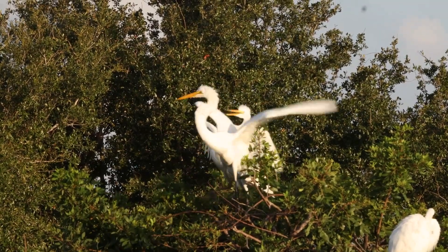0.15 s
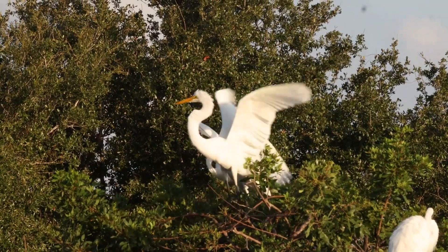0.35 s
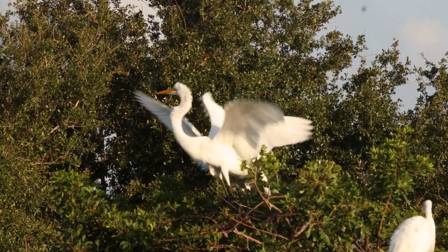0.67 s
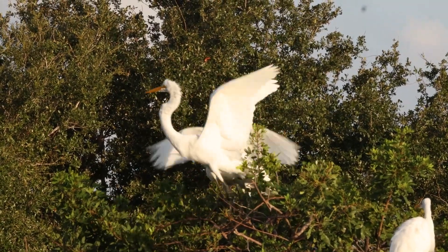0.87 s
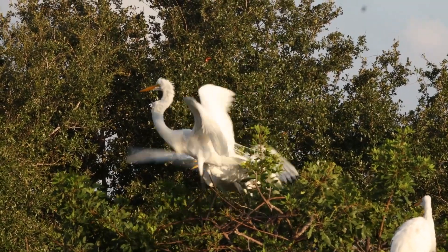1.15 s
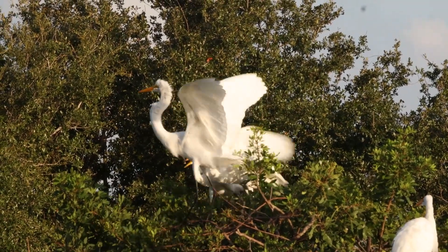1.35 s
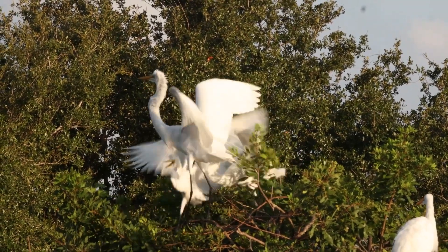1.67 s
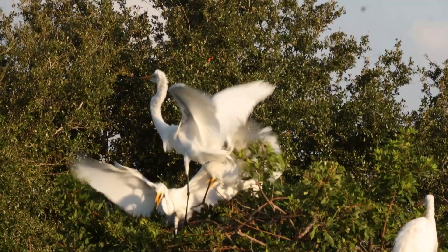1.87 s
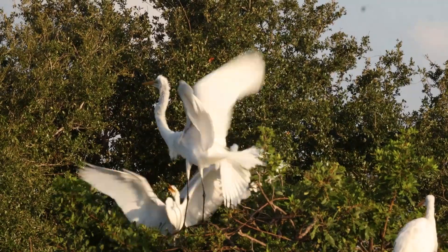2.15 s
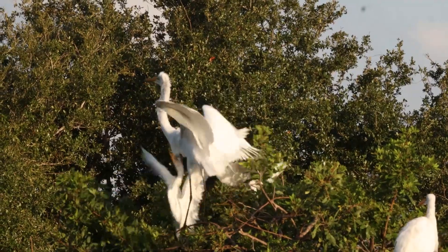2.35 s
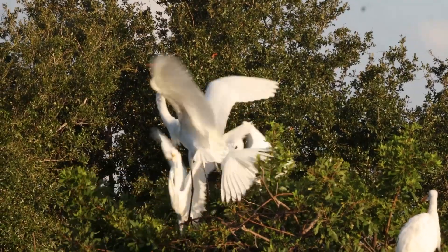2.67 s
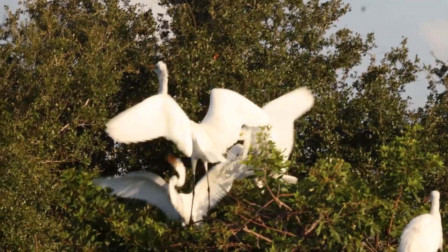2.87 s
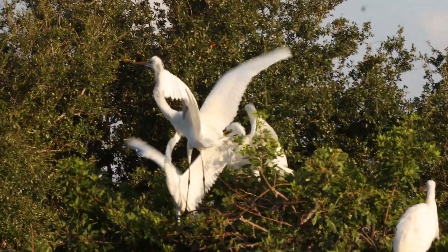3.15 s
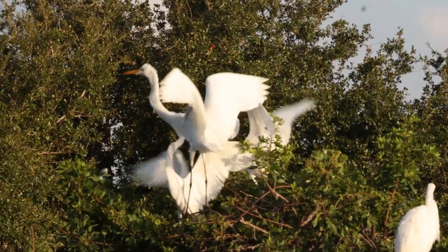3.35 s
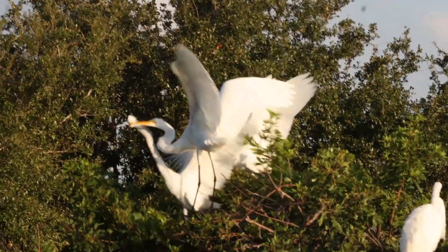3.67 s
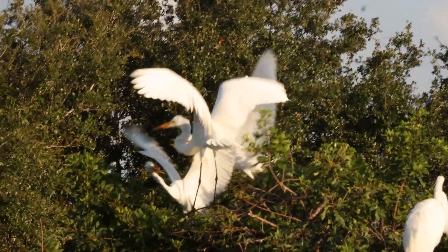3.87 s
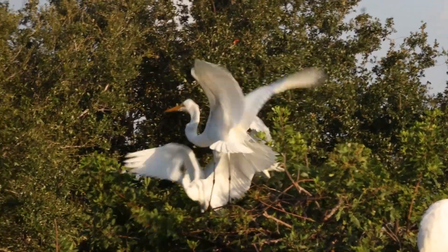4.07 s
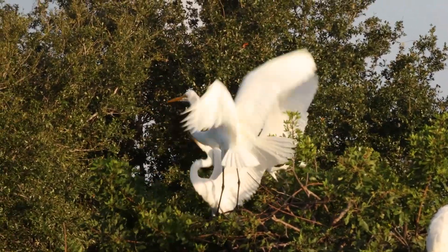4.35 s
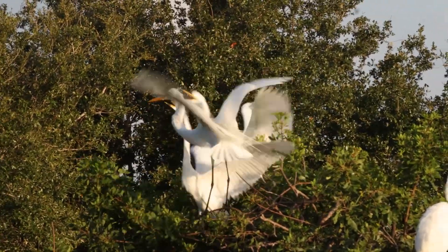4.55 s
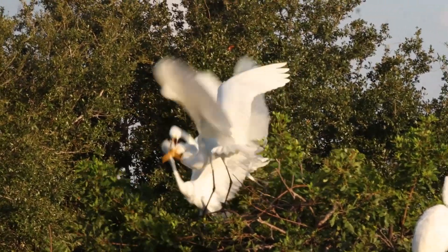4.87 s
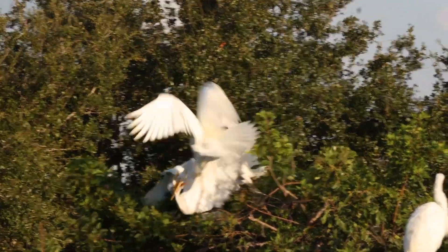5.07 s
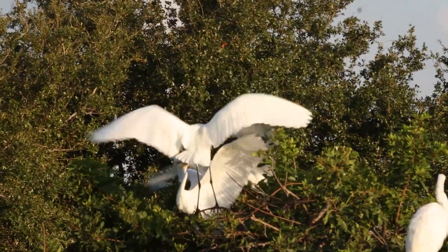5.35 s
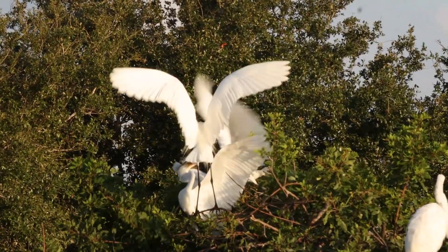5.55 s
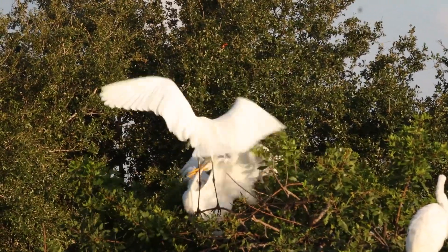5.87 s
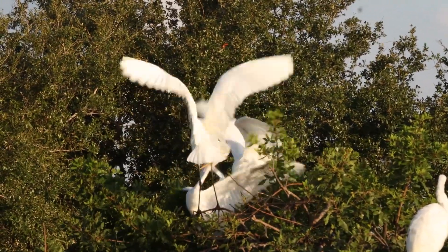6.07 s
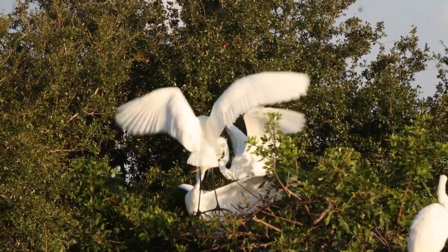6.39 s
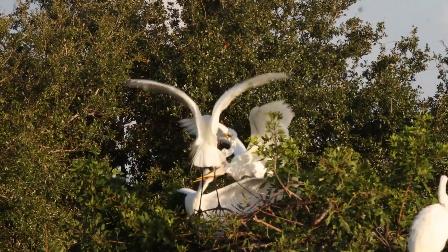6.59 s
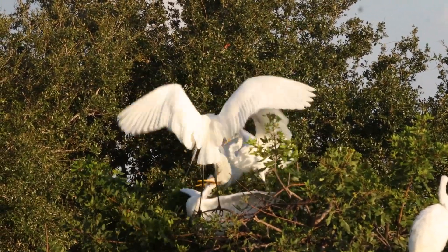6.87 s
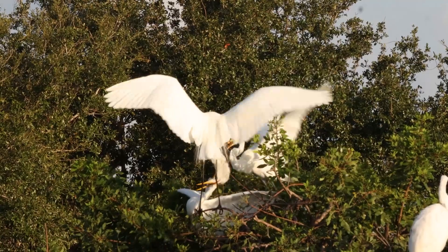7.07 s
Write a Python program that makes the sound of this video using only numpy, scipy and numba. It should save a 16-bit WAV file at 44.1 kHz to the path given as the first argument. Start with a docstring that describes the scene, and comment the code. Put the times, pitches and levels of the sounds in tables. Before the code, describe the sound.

Large white wading birds squabble at a treetop nest with rapid harsh squawks and hoarse croaks, easing to softer chatter while small birds whistle behind.

```python
"""Egrets squabbling over a nest

Close to the microphone, one egret squawks about five times a second, loud, then in a softer chatter; a hoarser one
croaks in between and twigs snap. Membrane slaps and turbulent air drive moving resonances of throat and bill:
the wider the bill gapes, the brighter and raspier the call. Farther off, small birds whistle (falling sines) and
trill (pulsing noise) over a distant rush (coloured noise), an engine's hum (harmonics) and a faint, wavering tone."""
import sys
import numpy as np
from scipy import signal
from scipy.fft import rfft, irfft, next_fast_len
from scipy.io import wavfile
from scipy.ndimage import uniform_filter1d, map_coordinates
from numba import njit

SR = 44100
rng = np.random.default_rng(int(sys.argv[2]) if len(sys.argv) > 2 else 0)


def unload_audio(sound):
    """Save the sound as a 16-bit wav file, at the path given as the first command line argument."""
    columns = np.transpose(np.atleast_2d(sound))
    # keep every value between -1 and 1, then stretch to whole-number steps
    steps = np.round(np.clip(columns, -1, 1) * 32767)
    wavfile.write(sys.argv[1], SR, steps.astype(np.int16))


N = 318402
TIME = np.arange(N) / SR


def amp(db):
    """Decibels to an amplitude factor."""
    return 10 ** (np.asarray(db) / 20)


def unit(x):
    """Scale to rms 1."""
    return x / np.sqrt(np.mean(x ** 2) + 1e-20)


def ramp(t, seconds):
    """From 0 at t = 0 up to 1 after so many seconds."""
    return np.clip(t / seconds, 0, 1)


def along(points, hz):
    """Interpolate (frequency [Hz], value) points on a log frequency axis."""
    f, v = np.transpose(points)
    return np.interp(np.log(hz + 1), np.log(f + 1), v)


def wobble(rate, size=N):
    """A smooth random curve with rate knots a second."""
    knots = rng.standard_normal(1024)
    return map_coordinates(knots, [np.arange(size) * rate / SR], mode="wrap")


def filtered(x, response):
    """Apply a complex response of frequency to x."""
    m = next_fast_len(len(x) + 4096)
    spectrum = rfft(x, m) * response(np.fft.rfftfreq(m, 1 / SR))
    return irfft(spectrum, m)[:len(x)]


def band(x, hz, width_hz):
    """A fixed resonance, squared for steep skirts, at rms 1."""
    def response(f):
        damping = 1j * f * width_hz
        return (damping / (hz * hz - f * f + damping)) ** 2
    return unit(filtered(x, response))


@njit
def moving_resonance(x, hz, width_hz):
    """A two-pole band-pass whose centre moves."""
    y, low, mid = np.zeros(len(x)), 0., 0.
    for i in range(len(x)):
        g = np.tan(np.pi * hz[i] / SR)
        y[i] = (mid + g * (x[i] - low)) / (1 + g * (g + width_hz / hz[i]))
        mid, low = 2 * y[i] - mid, low + 2 * g * y[i]
    return y


def add(track, s, x):
    """Mix x into the track at time s [s]."""
    i = round(s * SR)
    x, i = x[max(-i, 0):], max(i, 0)
    track[i:i + len(x)] += x[:max(len(track) - i, 0)]


# spectrum of the rush as distance leaves it: (frequency [Hz], relative level per Hz [dB])
RUSH_SPECTRUM = [(18, -41), (28, -16), (40, -19), (70, -3.5), (105, 0), (150, -0.5), (210, -3), (300, -6),
                 (400, -4), (510, -1), (750, 3.5), (950, 3.5), (1750, -0.5), (2300, -2), (3000, 0),
                 (4200, -13.5), (6300, -23.5), (12000, -40.5), (15500, -51)]


def distant_rush(rush_db=-40.0, patchy_db=0.83):
    """Soft noise from far away, its level patchy across time and frequency."""
    z = signal.stft(rng.standard_normal(N), nperseg=512)[2]
    across_pitch = uniform_filter1d(rng.standard_normal(z.shape), size=5, axis=0)
    patches = unit(uniform_filter1d(across_pitch, size=16, axis=1))
    air = signal.istft(z * amp(patchy_db * patches), nperseg=512)[1][:N]
    return amp(rush_db) * unit(filtered(air, lambda hz: amp(along(RUSH_SPECTRUM, hz))))


HUM_DB, HUM_SWELL_DB = -60.5, 7.5
HUM_SWELL_AT_S, HUM_RISE_S, HUM_EASE_S = 4.5, 0.065, 2.9
# harmonics of the hum: (multiple of the engine's pitch [1], relative level [dB])
HUM_HARMONICS = [(1, -11.5), (2, 3.5), (3, -4), (4, -6)]


def engine_hum(engine_hz=81.5):
    """A far engine's wavering harmonics swell once and ease off."""
    phase = 2 * np.pi * np.cumsum(engine_hz * (1 + 0.0078 * wobble(5))) / SR
    drone = sum(amp(db + 0.45 * wobble(1.94)) * np.sin(k * phase) for k, db in HUM_HARMONICS)
    t = np.maximum(TIME - HUM_SWELL_AT_S, 0)
    swell = ramp(t, HUM_RISE_S) * np.exp(-t / HUM_EASE_S)
    return amp(HUM_DB + HUM_SWELL_DB * swell) * unit(drone)


# spells of the far tone: (start [s], length [s], mean pitch [Hz], level [dB])
FAR_TONE_SPELLS = [(0, .55, 547, -56.5), (.65, 0.33, 566, -57), (2.1, 0.65, 549, -56),
                   (4.4, 0.58, 543, -55)]


def far_tone(waver=0.0037):
    """A faint, slightly wavering sine drifts in and out of the distant rush."""
    out = np.zeros(N)
    for s, length, hz, db in FAR_TONE_SPELLS:
        phase = 2 * np.pi * np.cumsum(hz * (1 + waver * wobble(6))) / SR
        arch = np.abs(np.sin(np.pi * ramp(TIME - s, length)))
        out += amp(db) * np.sqrt(2 * arch) * np.sin(phase)
    return out


TRILL_AT_S, TRILL_S, TRILL_DB = 0.0505, 0.544, -51  # level before the mix
TRILL_ATTACK_S, TRILL_RELEASE_S = .008, 0.099
TRILL_ACCENT_DB, TRILL_ACCENT_S = 20, 0.0089  # it opens with a sharp note
# noise bands of the trill: (centre [Hz], width of one filter stage [Hz], relative level [dB])
TRILL_NOISE_BANDS = [(3310, 510, 7), (4180, 260, -5), (5720, 340, -4)]


def trill(rate_hz=41, depth_db=4):
    """A distant songbird's buzzy trill: banded noise whose level pulses fast."""
    noise = rng.standard_normal(N)
    buzz = sum(amp(db) * band(noise, hz, width) for hz, width, db in TRILL_NOISE_BANDS)
    t = np.maximum(TIME - TRILL_AT_S, 0)
    held = ramp(t, TRILL_ATTACK_S) * ramp(TRILL_S - t, TRILL_RELEASE_S)
    level = TRILL_DB + TRILL_ACCENT_DB * np.exp(-t / TRILL_ACCENT_S)
    pulse = depth_db * np.sin(2 * np.pi * rate_hz * TIME)
    return held * amp(level + pulse) * unit(buzz)


def branches(x, share, spread_s, count):
    """Quick copies return off near branches and wings, drawn anew for each call; the energy is kept."""
    taps = np.zeros(SR // 20)
    delay, gain = rng.random(count), rng.standard_normal(count)
    places = np.clip(spread_s * delay * SR, 1, len(taps) - 1).astype(int)
    taps[places] = gain * (1 - delay / 2)
    taps *= share / np.linalg.norm(taps)
    taps[0] = 1  # the direct path
    y = signal.fftconvolve(x, taps)
    return y * np.linalg.norm(x) / np.linalg.norm(y)


def falling_note(length, start_hz, end_hz, bend=1.6):
    """A small bird slides down a quavering tone, blurred by the foliage in between."""
    t = np.arange(SR // 4) / SR
    u = ramp(t, length)
    quaver = 1 + .035 * wobble(700, len(t))
    hz = (start_hz + (end_hz - start_hz) * u ** bend) * quaver
    swell = np.sqrt(2 * np.abs(np.sin(np.pi * u)))
    tone = swell * np.sin(2 * np.pi * np.cumsum(hz) / SR)
    return branches(tone, share=.75, spread_s=length / 4, count=12)


# faint chirps, one at random in each slot; the length, pitch and level are the middle of a random range
CHIRP_SLOT_S, CHIRP_S, CHIRP_HZ, CHIRP_FALL_HZ_PER_S = .45, 0.052, 2890, 11770
CHIRP_DB = -48  # before the mix
# clear whistles: (start [s], length [s], start pitch [Hz], end pitch [Hz], level before the mix [dB])
WHISTLE_NOTES = [(-.02, 0.052, 3250, 3050, -32), (0.09, 0.11, 3080, 2410, -38.5),
                 (0.596, 0.092, 3420, 3260, -43), (1.051, 0.15, 3210, 2620, -39),
                 (1.471, 0.048, 2840, 2330, -48), (2.071, .04, 3060, 2760, -35.5),
                 (2.197, 0.054, 3140, 2800, -40), (2.256, 0.077, 2390, 1915, -46),
                 (2.547, .032, 2940, 2430, -46.5), (2.715, .11, 3410, 2970, -44.5),
                 (3.629, 0.057, 3390, 2770, -38.5), (4.89, 0.15, 3710, 3650, -52.5),
                 (5.338, .075, 2870, 2760, -49), (5.902, 0.18, 3280, 2810, -45),
                 (6.914, .078, 3310, 2880, -47), (7.048, .15, 3350, 2790, -47.5)]


def small_birds():
    """Clear falling whistles farther off, with faint quick chirps scattered between them."""
    out = np.zeros(N)
    for s, length, start_hz, end_hz, db in WHISTLE_NOTES:
        add(out, s, amp(db) * falling_note(length, start_hz, end_hz))
    for k, (late, long, high, loud) in enumerate(rng.uniform(-1, 1, size=(16, 4))):
        length = CHIRP_S * (1 + long / 2)
        hz = CHIRP_HZ * (1 + 0.099 * high)
        chirp = falling_note(length, hz, hz - CHIRP_FALL_HZ_PER_S * length)
        s = (k + (1 + late) / 2) * CHIRP_SLOT_S
        add(out, s, amp(CHIRP_DB + 3 * loud) * chirp)
    return out


# how long the grove rings: (frequency [Hz], time to fall by 60 dB [s])
GROVE_DECAY = [(500, 0.47), (2500, 0.38), (6000, 0.41), (14000, 0.1)]


def grove(x):
    """Leaves and trunks scatter a short noise-like tail, the high treble dying first."""
    hz, t, z = signal.stft(rng.standard_normal(SR // 2), SR, nperseg=256)
    decay = amp(-60 * t / along(GROVE_DECAY, hz)[:, None])
    tail = signal.istft(z * decay, SR, nperseg=256)[1]
    tail = np.pad(tail / np.linalg.norm(tail), (SR // 500, 0))  # starts 2 ms late
    return signal.fftconvolve(x, tail)[:N]


# snaps at the nest: (time [s], level before trim and mix [dB])
TWIG_SNAPS = [(5.0554, -50), (5.1971, -46), (5.785, -36.5), (7.005, -37)]


def twigs(t60=0.013, snap_db=-1.0):
    """Dry twigs crack under the birds' feet: broad bursts of noise that die within milliseconds."""
    out, t = np.zeros(N), np.arange(SR // 20) / SR
    for s, db in TWIG_SNAPS:
        crack = band(rng.standard_normal(len(t)), 3700, 6000)
        add(out, s, amp(db + snap_db - 60 * t / t60) * crack)
    return out


def syrinx(pitch, rough, jitter, scatter_db, puff):
    """Uneven slaps of the membranes, each followed by a puff of turbulent air."""
    size = len(pitch)
    uneven_pitch = pitch * (1 + jitter * rough * wobble(250, size))
    cycles = np.cumsum(uneven_pitch) / SR + rng.random()
    slaps = np.diff(np.floor(cycles), prepend=0) * amp(scatter_db * wobble(294.0, size))
    air = rng.standard_normal(size) * np.exp(-(cycles % 1) / puff)
    return np.sqrt(1 - rough) * unit(slaps) + np.sqrt(rough) * unit(air)


PLAIN_CALL_DB, RASP_GROWS = -28.5, 0.27  # extra rasp [dB] for each dB that a call is louder than a plain one
THROAT_SAG = .1  # share by which the throat resonance ends lower than it began


def egret_call(length, peak, db, opening, throat_hz, pitch_hz, width_hz, bill_db, rasp_db, rasp_hz,
               rasp_width_hz, rough, throat_arch=0.24, catch=0.29, catch_s=0.0039, soft_hz=5600,
               bill_hz=3800, bill_width_hz=1500):
    """One push of air: pitch and throat resonance rise and sink as the bill opens and shuts."""
    by_gape = (pitch_hz, width_hz, bill_db, rasp_db, rasp_hz, rasp_width_hz)
    hz, width, hollow_db, thin_db, thin_hz, thin_width = (
        shut + (wide - shut) * opening for shut, wide in by_gape)
    t = np.arange(SR // 6) / SR
    u = ramp(t, length)
    skew = np.log(.5) / np.log(np.clip(peak, .05, .95))  # puts the top of the swell at the peak
    swell = np.abs(np.sin(np.pi * u ** skew))
    effort = swell ** 0.8 + catch * (1 - u) * ramp(t, catch_s)  # the voice catches abruptly
    gape = np.sin(np.pi * u) - np.pi / 4
    pitch = hz * (1 + .16 * gape)
    harsh = np.clip(rough + 1.8 * amp(db) * effort, 0, 1)  # the harder the push, the rougher the voice
    voice = syrinx(pitch, harsh, jitter=.06, scatter_db=1.8, puff=.8)
    soft = filtered(voice, lambda f: 1 / np.sqrt(1 + (f / soft_hz) ** 6))

    centre = throat_hz * (1 + throat_arch * gape - THROAT_SAG * (u - .5))
    throat = unit(moving_resonance(moving_resonance(soft, centre, width), centre, width))

    # the bill's hollow has its own resonance, in opposite phase to the throat
    hollow = bill_hz * (1 + throat_arch * gape / 2)
    ring = moving_resonance(moving_resonance(soft, hollow, bill_width_hz), hollow, bill_width_hz)
    bill = -amp(hollow_db) * unit(ring)

    # a thin rasp on top, out of step with the voice
    rasp_source = syrinx(pitch, harsh, jitter=0.31, scatter_db=4.0, puff=0.73)
    rasp_level = amp(thin_db + RASP_GROWS * (db - PLAIN_CALL_DB))
    rasp = rasp_level * band(rasp_source, thin_hz, thin_width)

    call = effort * (throat + (.6 + .5 * swell) * (bill + rasp))
    return amp(db) * branches(call, share=1.05, spread_s=.005, count=22)


CROAK_PEAK = 0.35  # place of the peak in a croak, 0-1
# the hoarser voice: pitch, throat width, bill, rasp, each (bill nearly shut, wide open) [Hz or dB]; roughness [0-1]
CROAK_VOICE = dict(pitch_hz=(193.2, 205.8), width_hz=(1800, 1800), bill_db=(-20, -2.5), rasp_db=(-30.5, -6),
               rasp_hz=(5300, 5870), rasp_width_hz=(1800, 2500), rough=.38)
# croaks: (start [s], length [s], level before the mix [dB], gape of the bill [0-1], throat resonance [Hz])
CROAK_CALLS = [(0.028, 0.076, -35, .05, 2220), (0.194, .12, -29, .15, 2130),
               (1.231, .062, -30.5, 0.48, 2060), (1.633, 0.082, -33, .5, 2000),
               (1.782, 0.067, -34, 0.56, 1930), (2.012, .1, -33.5, 0.88, 2260),
               (2.168, 0.08, -27.5, 0.73, 2260), (2.837, 0.096, -32.5, 0.52, 2230),
               (3.249, 0.049, -30.5, 0.16, 2290), (3.395, 0.044, -30, 0.46, 2400),
               (3.681, 0.074, -31.5, 0.23, 2240), (3.845, 0.064, -39.5, 0.41, 2180),
               (3.898, 0.061, -32.5, 0.33, 2060), (4.463, 0.069, -27.5, 0.39, 2280),
               (6.243, .055, -36, 0.96, 1800), (6.289, 0.095, -36, 0.24, 2000),
               (6.998, 0.057, -38.5, 1, 1480)]


def croaks():
    """A second, hoarser bird at the nest, with more turbulent air in its voice."""
    out = np.zeros(N)
    for s, length, db, opening, throat_hz in CROAK_CALLS:
        add(out, s, egret_call(length, CROAK_PEAK, db, opening, throat_hz, **CROAK_VOICE))
    return out


# the leading voice: pitch, throat width, bill, rasp, each (bill nearly shut, wide open) [Hz or dB]; roughness [0-1]
SQUAWK_VOICE = dict(pitch_hz=(167.8, 279.4), width_hz=(590, 1930), bill_db=(-12, 5.5), rasp_db=(-22, -8.5),
                rasp_hz=(5060, 6260), rasp_width_hz=(1550, 3700), rough=.24)
# squawks: (start [s], length [s], place of the peak [0-1], level before the mix [dB],
# gape of the bill [0-1], throat resonance [Hz])
SQUAWK_CALLS = [(0.422, .075, .24, -31, 0.89, 2480), (0.635, .084, .5, -28, 0.51, 2320),
                (0.806, 0.092, 0.34, -27.5, 0.45, 2230), (0.97, 0.06, 0.27, -25.5, 0.46, 2170),
                (1.102, 0.084, 0.58, -30.5, 0.77, 2650), (1.272, 0.041, 0.3, -33, 0.9, 2400),
                (1.301, 0.037, 0.47, -30, 0.8, 2700), (1.381, 0.077, 0.1, -27, 0.47, 2010),
                (1.553, 0.088, 0.58, -30, 0.8, 2500), (1.725, 0.071, .26, -33, 0.81, 2540),
                (1.951, 0.093, 0.55, -27.5, 0.9, 2530), (2.096, .077, 0.25, -26.5, 0.85, 2430),
                (2.364, .084, .38, -21, 0.58, 2740), (2.44, 0.079, .45, -33, .06, 1590),
                (2.6, 0.12, 0.42, -25.5, 0.2, 2280), (2.784, 0.074, 0.47, -23.5, 0.52, 2600),
                (3.0, 0.091, 0.46, -24, 0.5, 2340), (3.174, 0.084, 0.24, -26.5, 0.27, 2380),
                (3.406, 0.11, 0.45, -26, 0, 2280), (3.588, 0.087, 0.26, -27, 0.19, 2480),
                (4.009, 0.068, 0.01, -25.5, 0.63, 2660), (4.031, 0.048, 0.82, -27, 0.59, 2330),
                (4.217, 0.098, 0.55, -24, 0.52, 2360), (4.395, 0.027, 0.65, -25, 0.76, 2430),
                (4.41, 0.063, 0.6, -26, 0.45, 2760), (4.622, 0.074, .17, -26, .17, 2100),
                (4.654, .095, 0.43, -27, .04, 2300), (4.833, .061, 0.26, -29.5, 0.01, 2220),
                (5.046, 0.098, 0.66, -34, 0.58, 2140), (5.227, 0.072, 0.42, -35, 0.93, 2100),
                (5.481, .088, .23, -37, .25, 2240), (5.64, 0.082, 0.39, -32.5, 0.48, 2530),
                (5.867, 0.084, 0.46, -34, 0.37, 2220), (6.04, 0.041, 0.26, -29.5, 0.45, 2650),
                (6.062, 0.044, 0.71, -28.5, 0.54, 2430), (6.474, 0.073, 0.1, -32.5, 0.13, 2220),
                (6.526, 0.049, 0.23, -29.5, 0.38, 2050), (6.682, 0.086, 0, -25.5, 0.37, 2080),
                (6.882, 0.11, 0.13, -38.5, 0.56, 1890), (7.151, 0.09, 0.31, -33.5, 0.6, 1910)]


def squawks():
    """The leading bird: narrow honks with the bill nearly shut, bright squawks with it wide open."""
    out = np.zeros(N)
    for s, length, peak, db, opening, throat_hz in SQUAWK_CALLS:
        add(out, s, egret_call(length, peak, db, opening, throat_hz, **SQUAWK_VOICE))
    return out


def scene():
    """The nest is near and fairly dry; the small birds, farther off, carry slightly more of the grove's tail."""
    near = squawks() + croaks() + twigs()
    far = small_birds() + trill()
    direct = amp(-1.98) * near + amp(7.5) * far
    scattered = grove(amp(-15) * near + amp(-4.5) * far)
    background = distant_rush() + engine_hum() + far_tone()
    return (direct + scattered + background)[None]


TOP_HZ = 15750
# the microphone housing's colour: (frequency [Hz], gain [dB])
HOUSING_COLOUR = [(1150, 2.5), (1320, 0), (1560, 2), (1790, -5.5), (1930, -0.5), (2250, -1.5), (2460, 2.5),
                  (2670, -4), (2930, -2), (3160, -5.5), (3540, -4.5), (3800, -5.5), (3980, -3), (5000, 2.5),
                  (6200, 2), (7500, 1.5), (13500, 5.5), (15700, -10)]


def record(dry):
    """The microphone's housing colours the sound; nothing passes above the band limit."""
    return filtered(dry[0], lambda hz: amp(along(HOUSING_COLOUR, hz)) * (hz < TOP_HZ))[None]


dry = scene()
out = record(dry)
unload_audio(out)
```